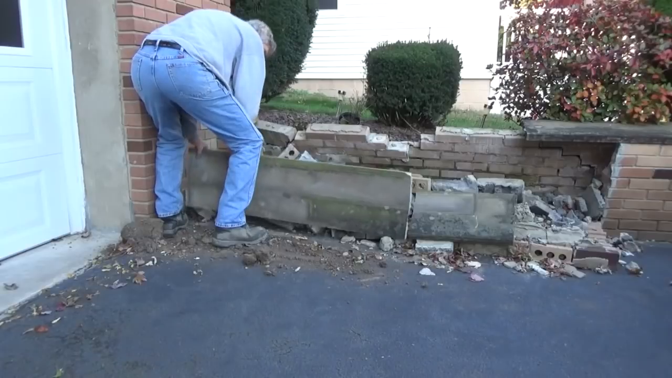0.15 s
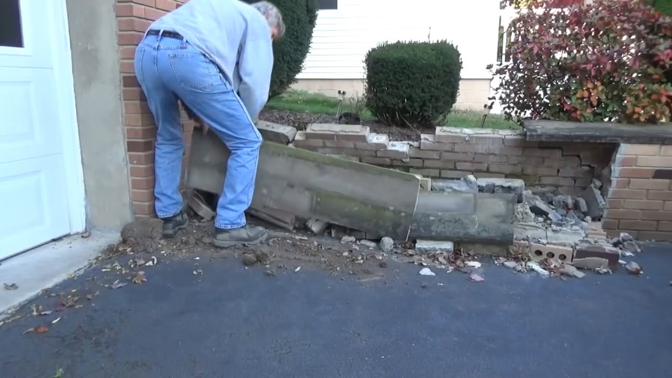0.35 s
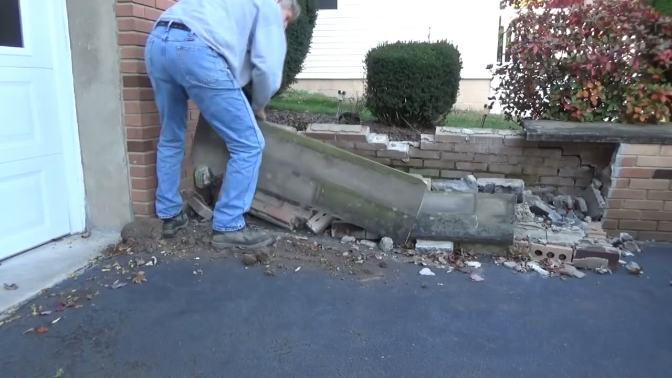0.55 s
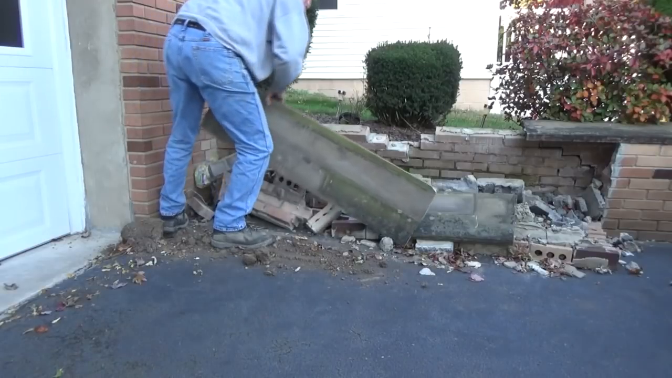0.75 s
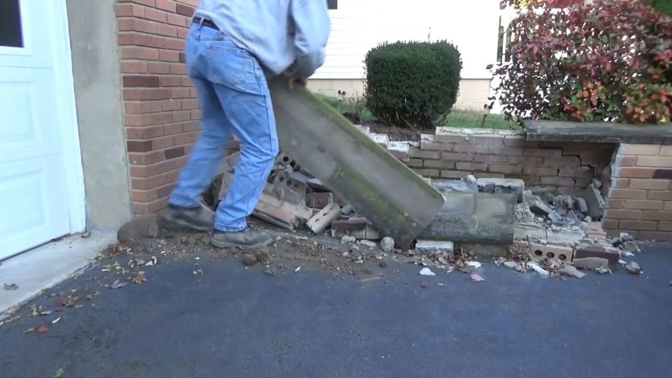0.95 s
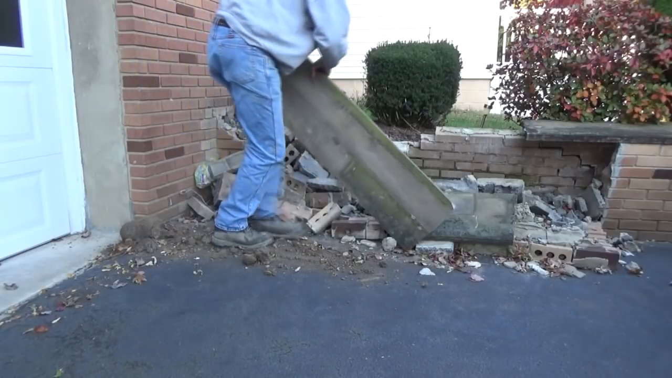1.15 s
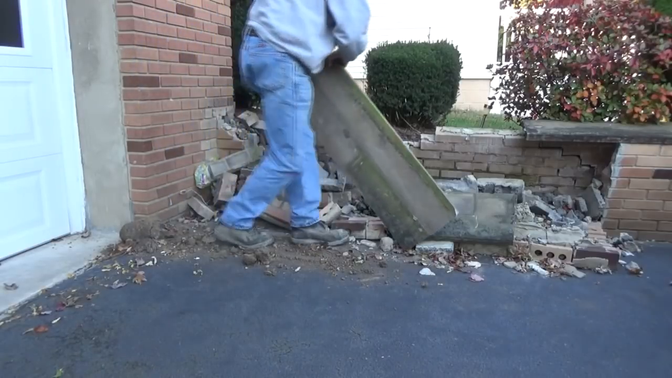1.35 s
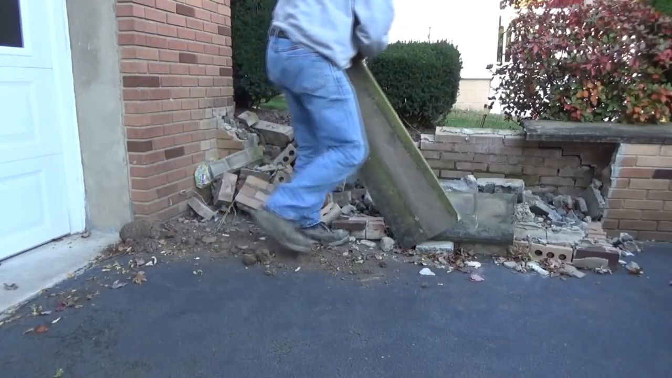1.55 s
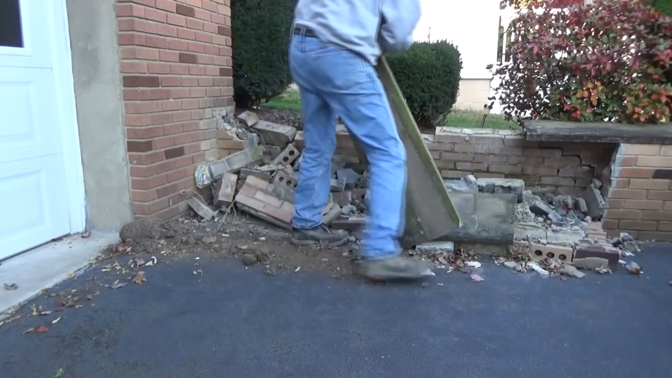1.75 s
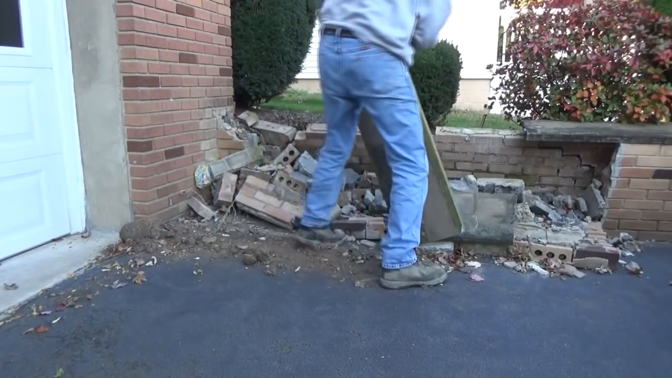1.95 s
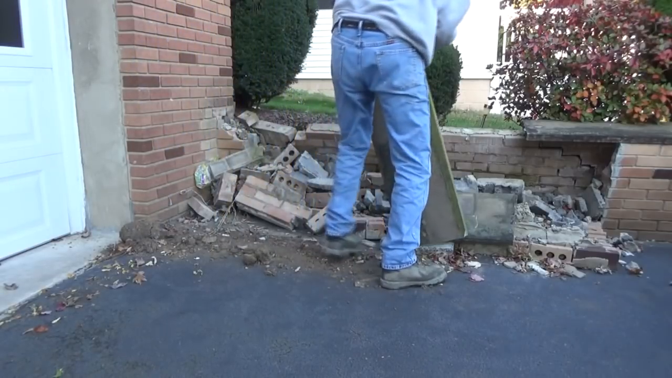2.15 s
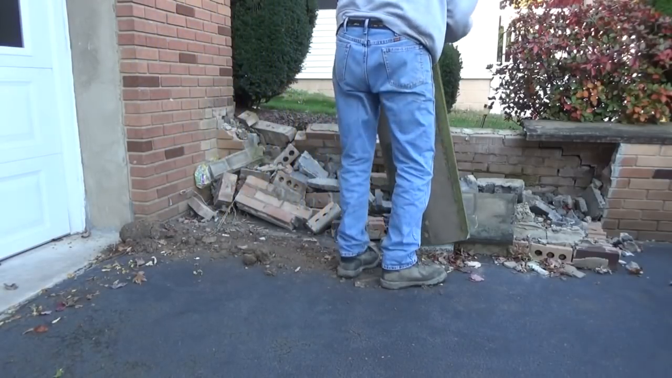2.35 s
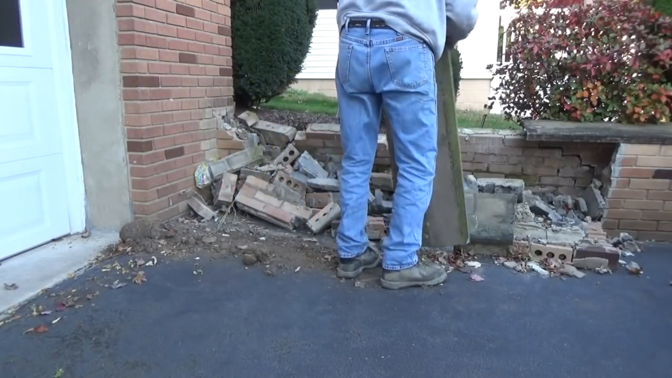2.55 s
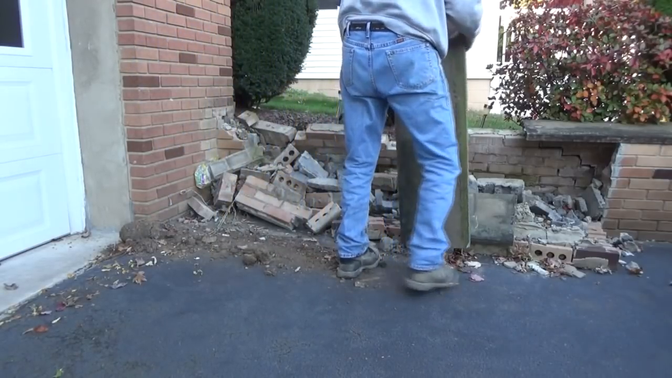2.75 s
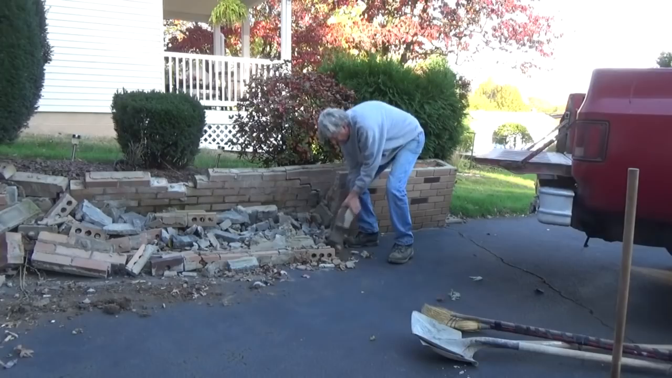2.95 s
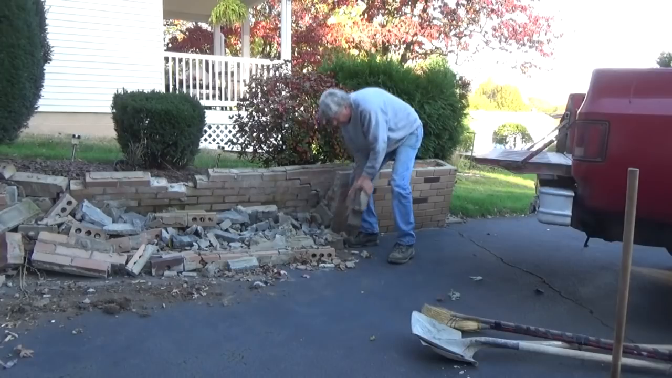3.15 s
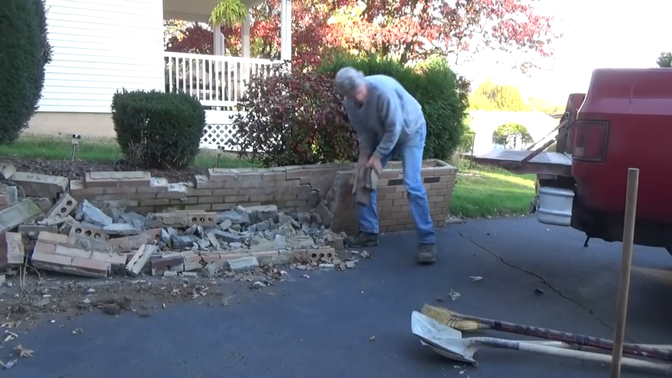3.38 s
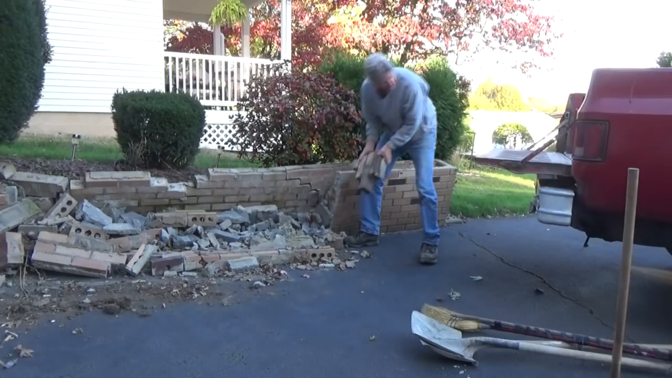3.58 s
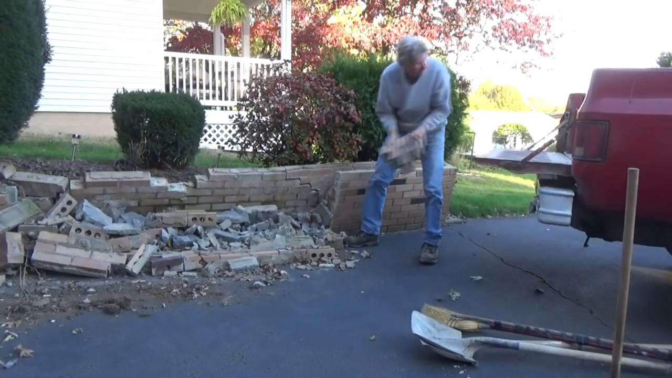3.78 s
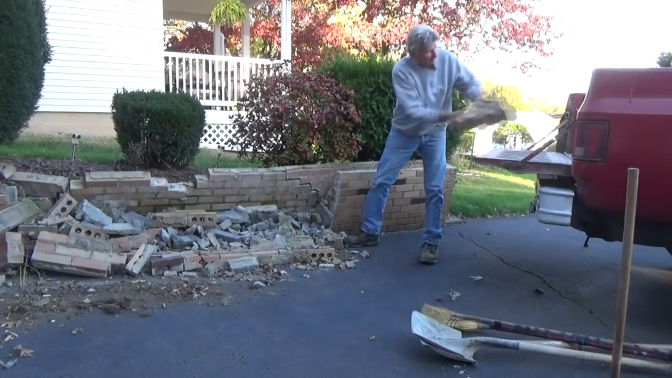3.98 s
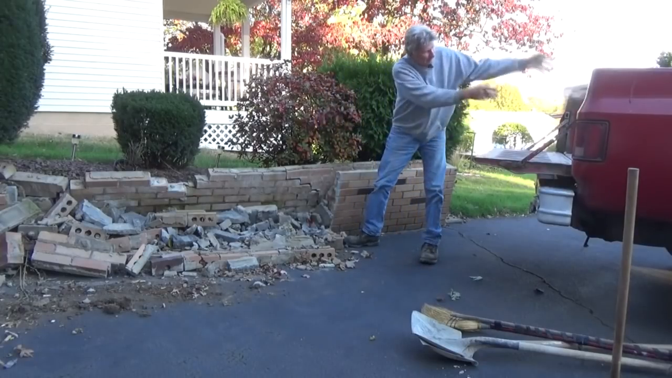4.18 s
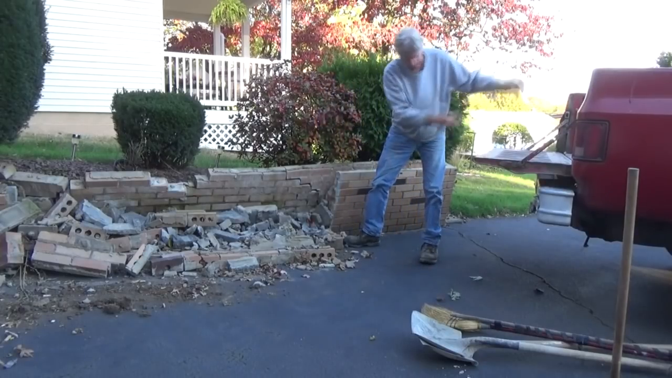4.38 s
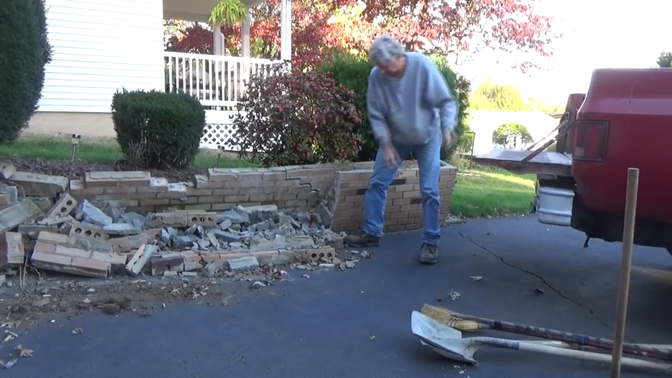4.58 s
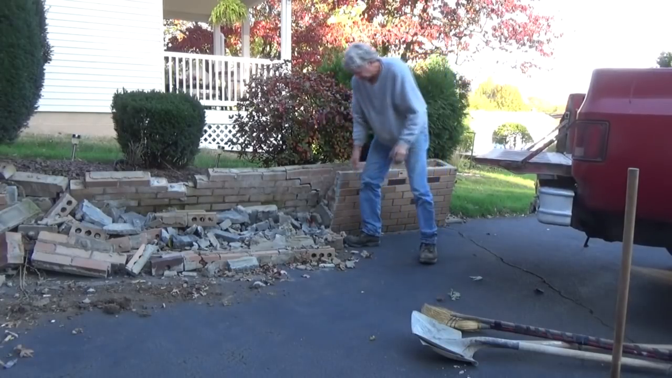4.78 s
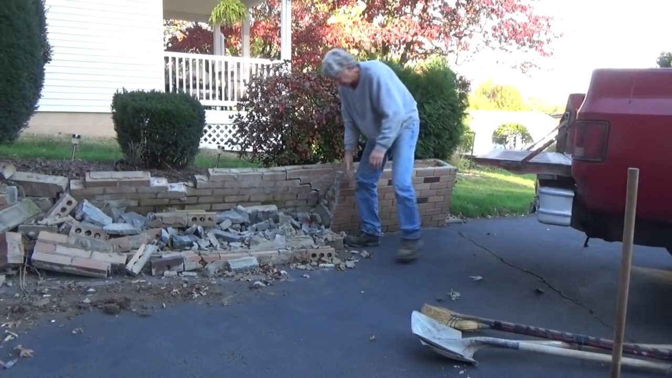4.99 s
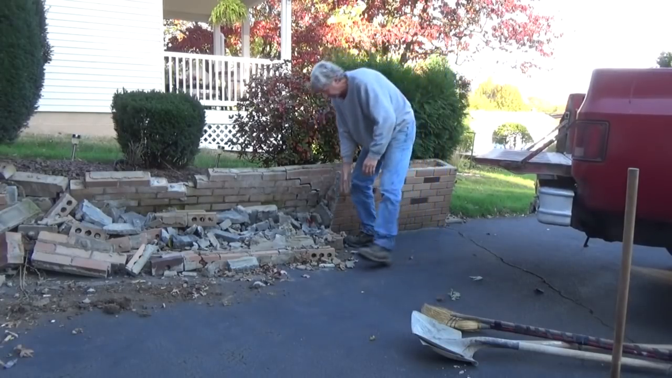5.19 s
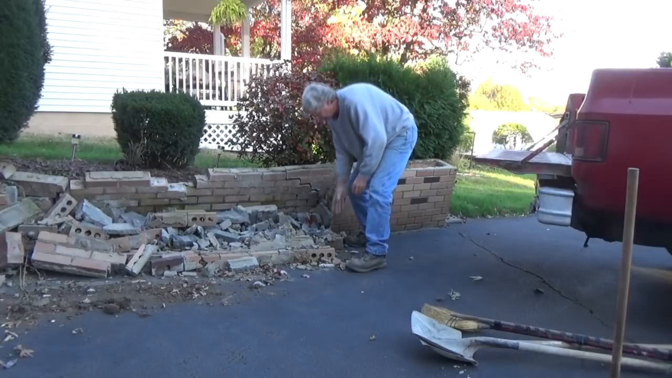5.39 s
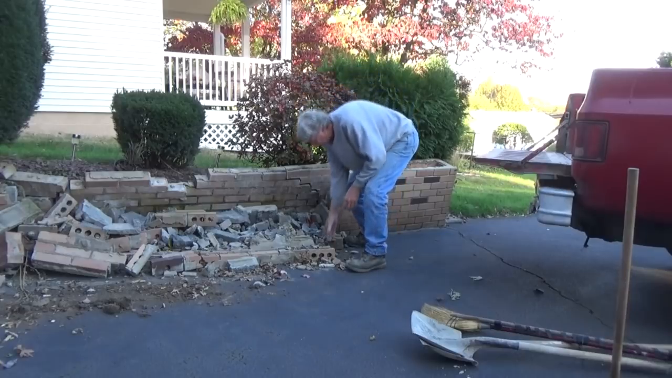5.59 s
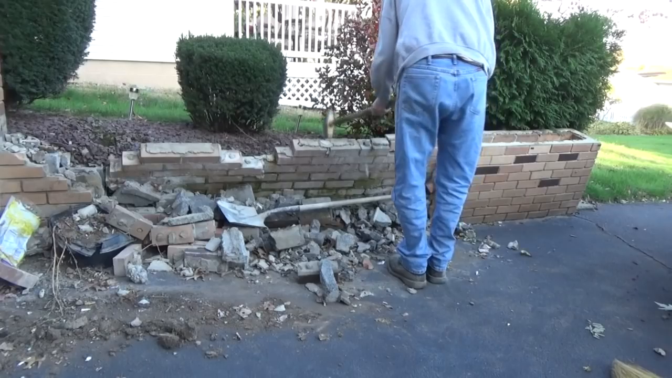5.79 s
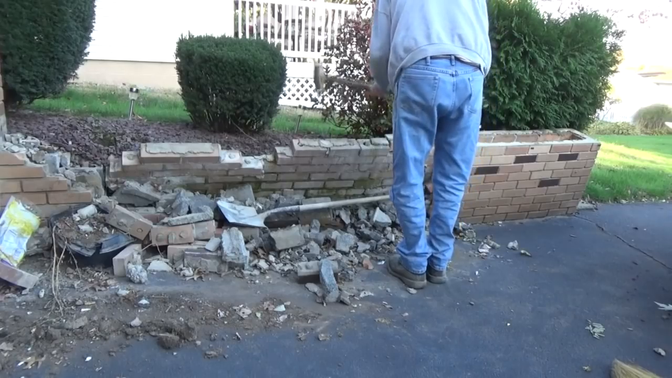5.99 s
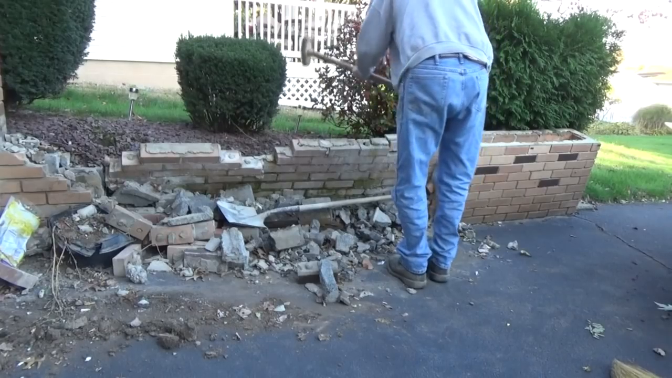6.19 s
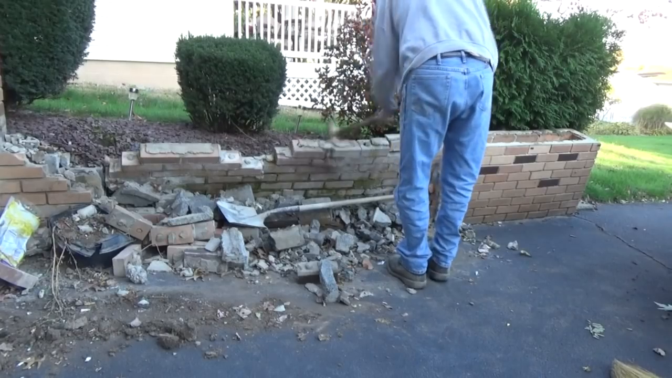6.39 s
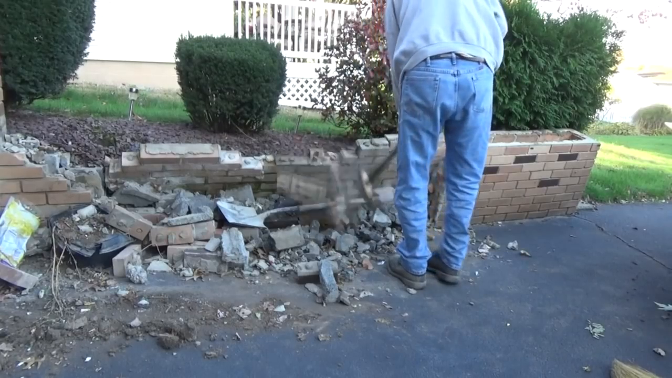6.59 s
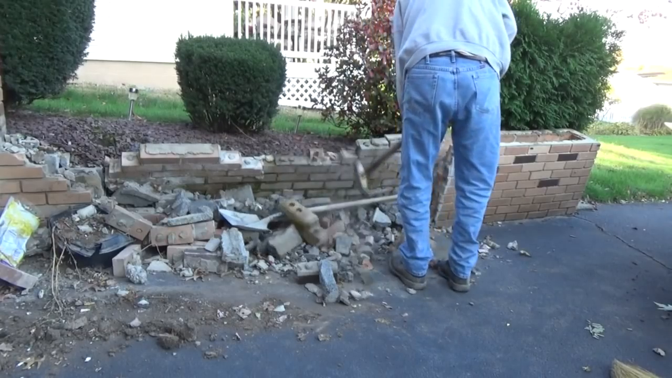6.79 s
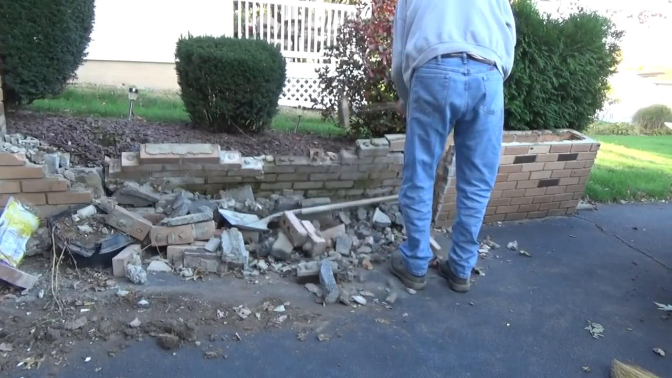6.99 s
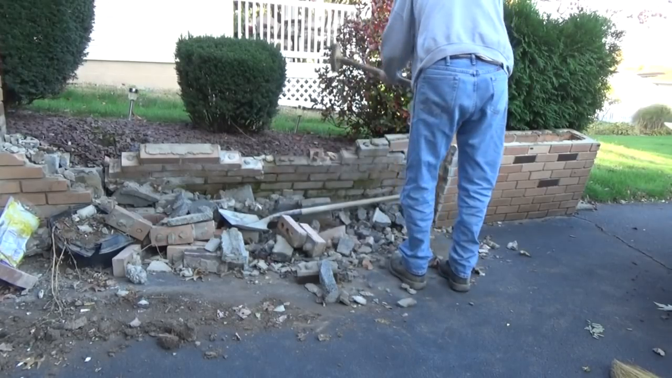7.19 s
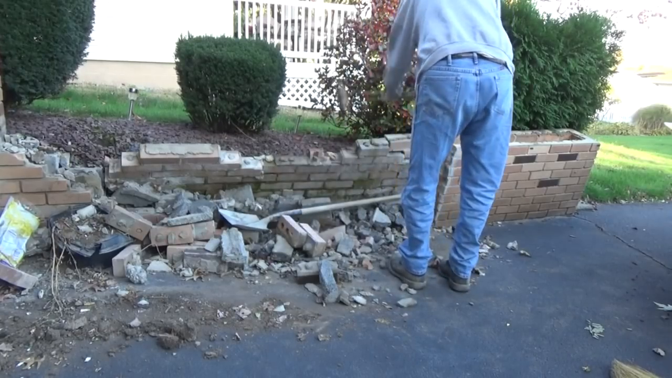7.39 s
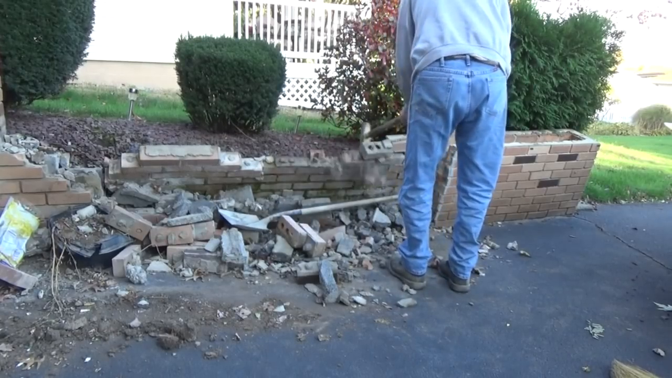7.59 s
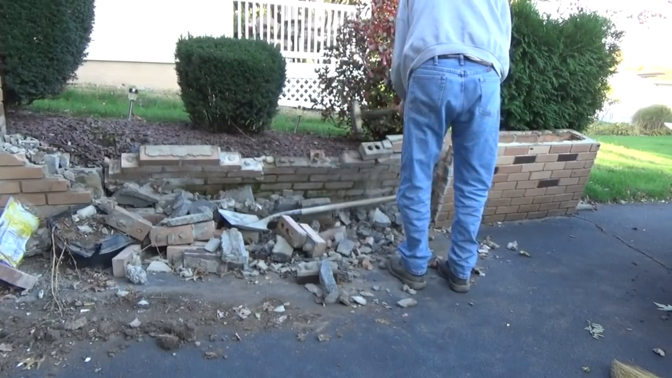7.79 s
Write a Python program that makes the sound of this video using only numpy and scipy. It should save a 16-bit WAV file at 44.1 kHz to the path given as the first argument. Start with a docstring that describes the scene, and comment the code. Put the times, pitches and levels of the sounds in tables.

```python
"""A sledgehammer strikes a brick wall twice; each impact excites a crack and a gritty burst that
decays by damping. After each blow, bricks and mortar fall on a shovel and excite its blade's modes.
Before the blows, a man walks a stone cap slab over driveway grit (stick-slip friction) and tosses a
lump of masonry into a pickup's steel bed, whose panels and floor resonate. The yard scatters a short
echo of the debris; behind it all are faint air noise, a far idling engine and a bird."""
import sys
import numpy as np
from scipy import signal
from scipy.fft import rfft, irfft, next_fast_len
from scipy.io import wavfile
from scipy.ndimage import uniform_filter1d

SR = 44100
rng = np.random.default_rng(int(sys.argv[2]) if len(sys.argv) > 2 else 0)


def to_wav(s):
    """Save 16-bit WAV."""
    ch = np.atleast_2d(s).T  # columns
    pcm = np.round(np.clip(ch, -1, 1) * 32767)  # PCM
    wavfile.write(sys.argv[1], SR, pcm.astype(np.int16))


N = 345744
TIME = np.arange(N) / SR
CONTROL_TIME = TIME[::48]
LEFT_MINUS_RIGHT = np.array([[1], [-1]])


def amp(db):
    """Amplitude ratio of a level in decibels."""
    return 10 ** (np.asarray(db) / 20)


def decay(t, t60):
    """Exponential damping: 60 dB in t60 seconds."""
    return np.exp(-np.log(1000) * t / t60)


def unit_rms(x):
    """Normalisation to an rms of 1."""
    return x / np.sqrt(np.mean(x ** 2) + 1e-20)


def steady(x, span_s):
    """Normalisation by the running rms, which flattens the envelope."""
    return x / np.sqrt(abs(uniform_filter1d(x ** 2, max(int(span_s * SR), 3))) + 1e-12)


def at_frequency(points, hz):
    """Interpolation on a logarithmic frequency axis."""
    f, value = np.transpose(points)
    return np.interp(np.log(hz + 1), np.log(f + 1), value)


def add(mix, start_s, sound):
    """Superposition of a delayed sound on the mix."""
    part = mix[:, max(round(start_s * SR), 0):][:, :sound.shape[-1]]
    part += sound[..., :part.shape[1]]


def colour(x, spectrum):
    """Zero-phase filtering by points of (f/Hz, gain/dB)."""
    size = next_fast_len(x.shape[-1])
    gain = amp(at_frequency(spectrum, np.fft.rfftfreq(size, 1 / SR)))
    return irfft(rfft(x, size) * gain, size)[..., :x.shape[-1]]


def resonator(x, hz, width_hz):
    """Forced response of one damped mode, with unit gain at resonance."""
    carrier = np.exp(2j * np.pi * hz * TIME)
    pole = np.exp(-np.pi * width_hz / SR)
    return 2 * (carrier * signal.lfilter([1 - pole], [1, -pole], x / carrier + 1e-18)).real


def resonances(x, modes):
    """Forced response of parallel modes (f/Hz, bandwidth/Hz, gain/dB)."""
    return sum(amp(db) * signal.lfilter(*signal.iirpeak(hz, hz / width, fs=SR), x)
               for hz, width, db in modes)


def ringing(modes):
    """Free vibration: damped sinusoids, each with a slightly different phase at the two ears."""
    t = np.arange(SR) / SR
    return sum(amp(db) * decay(t, t60) * np.sin(2 * np.pi * hz * t + 0.61 * rng.standard_normal((2, 1)))
               for hz, db, t60 in modes)


def damp_octaves(x, t60s, age):
    """Frequency-dependent damping: each octave decays at its own rate."""
    centres = np.geomspace(60, 15360, 9)
    log_f = np.log(np.fft.rfftfreq(x.shape[-1], 1 / SR) + 1)
    spectrum = rfft(x)
    bands = (irfft(spectrum * np.interp(log_f, np.log(centres), row), x.shape[-1]) for row in np.eye(9))
    return sum(band * decay(age, at_frequency(t60s, hz)) for hz, band in zip(centres, bands))


def crackle(size, per_s, spread_db):
    """Granular noise: two channels in short grains of random strength."""
    strength_db = spread_db * np.minimum(rng.exponential(1, size), 5)
    grain = np.minimum(np.arange(size) * per_s / SR, size - 1).astype(int)
    return unit_rms(rng.standard_normal((2, size)) * amp(strength_db[grain]))


def envelopes(start_s, rise_s, hold_s, t60):
    """Linear rise, hold and exponential decay, one column per event."""
    age = CONTROL_TIME[:, None] - start_s
    return np.clip(age / rise_s, 0, 1) * decay(np.maximum(age - rise_s - hold_s, 0), t60)


def power_sum(shapes, db):
    """Joint amplitude of incoherent events, whose powers add."""
    return np.interp(TIME, CONTROL_TIME, np.sqrt(np.sum((shapes * amp(db)) ** 2, axis=1)))


# stereo width: f/Hz, side over mid/dB
SIDE_SPECTRUM = [(60, -54), (200, -26), (600, -13.5), (1500, -11), (4500, -12.5), (8000, -11), (13000, -43)]
def stereo(pair, wide_db):
    """Partial coherence between the ears: two independent signals serve as mid and side."""
    side = amp(wide_db) * colour(pair[1], SIDE_SPECTRUM)
    return np.array([pair[0] + side, pair[0] - side])


# suburban air: f/Hz, relative level/dB
AIR_SPECTRUM = [(15, -34), (25, -12.5), (76, 0), (145, -4.5), (217, -5.5), (285, -10.5), (775, -9.5),
                (2480, -21), (2910, -20.5), (3160, -23), (5430, -29.5), (9570, -31), (16000, -39)]
def air():
    """Stationary broadband noise, strongest in the bass."""
    return amp(-48.5) * stereo(unit_rms(colour(rng.standard_normal((2, N)), AIR_SPECTRUM)), wide_db=4)


# course of the engine's loudness: t/s, level/dB
ENGINE_LEVELS = [(0.0, -50), (0.45, -46), (2.75, -50), (3.2, -63), (5.6, -64), (5.8, -57), (7.84, -52.5)]
def engine(hz=77.8):
    """Narrow-band noise beats at random: the throb of a far idling engine."""
    times, db = np.transpose(ENGINE_LEVELS)
    gain = amp(np.interp(TIME, times, db) - 2.5)
    hum = resonances(rng.standard_normal(N), [(hz, 8, 0)])
    throb = resonances(hum, [(hz, 16, 0)])
    return gain * steady(throb, 0.13)


# a far bird's calls: t/s, duration/s, first f/Hz, last f/Hz, level/dB
BIRD_CALLS = [(2.5, 0.153, 3040, 2880, -50), (3.898, .48, 3910, 3200, -55.5)]
def bird():
    """Frequency modulation: two simultaneous whistled tones swell, waver and sag in pitch."""
    out = np.zeros((2, N))
    waver_hz = 110 * unit_rms(uniform_filter1d(rng.standard_normal(N), 150))
    for start, duration, first_hz, last_hz, db in BIRD_CALLS:
        progress = np.linspace(0, 1, int(duration * SR))
        hz = first_hz + (last_hz - first_hz) * progress ** 2.3 + waver_hz[:len(progress)]
        phase = 2 * np.pi * np.cumsum(hz) / SR
        tones = np.sin(phase) + 0.65 * np.sin(.76 * phase)
        add(out, start, amp(db) * np.sin(np.pi * progress) * tones)
    return out


# reverberation time of the yard: f/Hz, T60/s
YARD_T60 = [(100, 0.49), (1000, 0.76), (4000, 0.32), (12000, 0.33)]
def yard_echo(x, reflections_per_s=2000):
    """Scattering from house front and driveway: convolution with sparse, decaying reflections."""
    t = np.arange(SR // 2) / SR
    taps = rng.standard_normal((2, len(t)))
    taps *= (rng.random((2, len(t))) < reflections_per_s / SR) * (t > .004)
    tail = damp_octaves(stereo(taps, wide_db=7), YARD_T60, t)
    return signal.fftconvolve(x.mean(0)[None], tail / np.linalg.norm(tail[0]), axes=1)[:, :N]


# slab, soles and bricks dragged over grit: t/s, rise/s, hold/s, stone/dB, crumbs/dB, sand/dB
GROUND_SCRAPES = [(0.0, 0.0029, 0.061, -40.5, -75, -79), (0.148, 0.031, 0.062, -66, -51, -38.5),
                  (0.276, 0.026, 0.017, -32, -41, -55), (0.447, .04, .01, -38.5, -53, -66),
                  (0.499, 0.031, 0.018, -26.5, -29.5, -36), (0.562, 0.027, 0.16, -36, -48, -60),
                  (0.798, 0.017, .08, -31, -46, -50), (0.908, 0.032, .01, -29.5, -35, -43),
                  (0.961, 0.022, 0.048, -38, -53, -53), (1.034, 0.018, 0.12, -62, -52, -45),
                  (1.138, 0.03, 0.056, -43, -40, -39.5), (1.233, .008, 0.051, -35.5, -35.5, -27.5),
                  (1.31, 0.014, 0.075, -36, -35, -28.5), (1.45, 0.031, 0.027, -34.5, -41.5, -41),
                  (1.533, 0.025, 0.045, -53, -47.5, -46), (1.625, 0.025, 0.024, -64, -47, -37),
                  (1.72, 0.026, 0.22, -43, -47.5, -49), (1.964, 0.017, .11, -32, -32.5, -34),
                  (2.11, 0.067, 0.092, -44, -35, -33), (2.27, 0.022, 0.016, -34, -26, -29.5),
                  (2.347, 0.032, 0.033, -36, -27.5, -33), (2.74, 0.021, 0.18, -42.5, -49, -52),
                  (3.113, 0.032, 0.061, -38, -34.5, -37.5), (3.248, .02, 0.057, -55, -48, -49),
                  (3.315, 0.078, .01, -51, -37, -36.5), (3.465, 0.016, 0.028, -45.5, -34.5, -33),
                  (3.987, 0.064, 0.13, -63, -53, -51), (5.45, 0.018, 0.017, -40, -67, -65),
                  (5.668, 0.0095, 0.015, -40, -48.5, -68), (5.812, .02, 0.05, -49, -49, -48),
                  (6.152, 0.035, 0.1, -41, -37, -41), (6.595, 0.11, 0.023, -45, -30, -34.5),
                  (7.069, 0.026, 0.071, -36, -35.5, -42)]
# weight or rubble landing on grit: t/s, T60/s, stone/dB, crumbs/dB, sand/dB
GROUND_CRUNCHES = [(0.097, 0.28, -55, -45.5, -54), (1.175, 0.094, -22.5, -35, -31),
                   (1.42, 0.16, -31.5, -27, -34), (1.885, 0.24, -38, -25, -25.5),
                   (2.687, 0.37, -40.5, -35, -39), (2.973, 0.55, -42, -38, -38),
                   (5.703, 0.43, -28.5, -32.5, -42), (5.893, 0.48, -41, -35.5, -37.5),
                   (6.001, 0.24, -36, -35, -44), (6.052, 0.45, -41, -31, -34.5),
                   (6.344, .3, -39, -35.5, -45), (6.704, 1.6, -28, -19.5, -27.5), (6.92, .7, -39, -45, -28),
                   (7.349, 0.75, -42.5, -52, -48), (7.779, 1.1, -50, -30, -29.5)]
def friction(scrape_t60=0.17, crunch_rise_s=0.0021, trickle_t60=0.91, trickle_db=-19):
    """Amplitudes of stone, crumb and sand noise under sliding and impact; loosened grit trickles on."""
    scrapes, crunches = np.transpose(GROUND_SCRAPES), np.transpose(GROUND_CRUNCHES)
    push = np.hstack([envelopes(*scrapes[:3], scrape_t60),
                      envelopes(crunches[0], crunch_rise_s, 0, crunches[1])])
    trickle = np.hstack([envelopes(*scrapes[:3], trickle_t60),
                         envelopes(crunches[0], crunch_rise_s, 0, trickle_t60)])
    shapes = np.maximum(push, amp(trickle_db) * trickle)
    return [power_sum(shapes, db) for db in np.hstack([scrapes[3:], crunches[2:]])]


def pebbles(per_s, spread_db, low_hz, decay_cycles, sizes=24):
    """A Poisson process of impacts: each bit of mortar rings in two modes set by its size."""
    out, t = np.zeros((2, N)), np.arange(900) / SR
    for hz in np.geomspace(low_hz, 11000, sizes):
        hits = np.flatnonzero(rng.random(N) < per_s / sizes / SR)
        for at, (strength, pan, detune, shape) in zip(hits, rng.random((len(hits), 4))):
            cycles = hz * (.9 + .2 * detune) * t
            modes = np.sin(2 * np.pi * cycles) + .5 * np.sin(2 * np.pi * cycles * (1 + shape / 2))
            clink = amp(spread_db * strength ** 2) * modes * np.exp(-cycles / decay_cycles)
            add(out, at / SR, np.outer([.7 + .6 * pan, 1.3 - .6 * pan], clink))
    return unit_rms(out)


# coarse crumbs and fine sand: f/Hz, relative level/dB
CRUMB_SPECTRUM = [(300, -65), (1200, -5.5), (2500, 1.5), (5000, 1.5), (7500, -5.5), (11000, -10.5),
                  (16000, -32)]
SAND_SPECTRUM = [(1000, -11.5), (5000, -8), (8000, -1.5), (10400, 0.5), (12300, -10), (16000, -15)]
def grit(crumb_gain, sand_gain):
    """Granular contact noise: crumbs crackle, sand fizzes and single pebbles click among them."""
    crumbs = steady(colour(crackle(N, per_s=1500, spread_db=3.5), CRUMB_SPECTRUM), .05)
    sand = steady(colour(crackle(N, per_s=2200, spread_db=2.85), SAND_SPECTRUM), 0.036)
    clicks = .45 * pebbles(per_s=170, spread_db=18, low_hz=3200, decay_cycles=2.5)
    grains = stereo(crumb_gain * crumbs + sand_gain * sand, wide_db=-2.5)
    return amp(-2.5) * (grains + np.hypot(crumb_gain, sand_gain) * clicks)


# rubbing stone: f/Hz, relative level/dB
STONE_SPECTRUM = [(50, -24), (110, -3), (370, 1), (850, -3.5), (1400, -1.5), (1900, -7.5), (2600, -10.5),
                  (4000, -14), (9000, -43)]
# hollow resonances of the slab: f/Hz, bandwidth/Hz, relative gain/dB
SLAB_MODES = [(193, 52, 9), (385, 86, 1), (536, 14, 2.5), (692, 80, 4.5), (784, 48, 7), (914, 130, 5),
              (1180, 170, -1.5), (1393, 48, 3.5), (1594, 82, 2), (1785, 55, 9.5)]
def grinding_slab(gain):
    """Stick-slip friction of rough stone drives the slab's modes."""
    slips = colour(crackle(N, per_s=900, spread_db=2.9), STONE_SPECTRUM)
    hollow_ring = unit_rms(resonances(slips, SLAB_MODES))
    rub = steady(unit_rms(slips) + 1.7 * hollow_ring, .06)
    return amp(-3.5) * stereo(rub, wide_db=-3.5) * gain


# boots, slab corners and bricks meeting the ground: t/s, level/dB, f/Hz, T60/s
GROUND_THUDS = [(0.204, -26.5, 324, 0.12), (0.531, -30, 188, 0.11), (1.179, -12, 496, 0.071),
                (1.419, -22.5, 180, 0.095), (1.893, -25, 231, 0.23), (1.977, -24.5, 231, 0.13),
                (2.041, -22, 680, 0.094), (2.297, -27, 899, 0.1), (5.564, -27.5, 223, 0.097),
                (5.702, -16.5, 189, 0.16), (6.056, -32, 330, 0.2), (6.205, -31, 330, 0.21),
                (6.727, -8.5, 756, 0.15), (6.782, -14, 234, 0.21), (6.819, -14.5, 735, 0.39),
                (6.974, -23, 286, 0.14), (7.11, -31.5, 282, 0.31), (7.2, -27.5, 330, 0.19),
                (7.283, -31.5, 350, 0.18), (7.782, -25, 870, 0.2)]
def thuds():
    """Heavily damped impacts: dull noise bursts with one broad spectral peak."""
    out, t = np.zeros((2, N)), np.arange(SR // 2) / SR
    for start, db, hz, t60 in GROUND_THUDS:
        spectrum = [(hz / 5, -20), (hz / 2, -2), (hz, 0), (hz * 2.5, -8), (hz * 6, -23), (hz * 20, -45)]
        noise = steady(colour(rng.standard_normal((2, len(t))), spectrum), 0.0145)
        envelope = (1 - np.exp(-t / 0.0062)) * decay(t, t60)
        add(out, start, amp(db - 4) * stereo(noise, wide_db=-9) * envelope)
    return out


# chips that snap or land: t/s, level/dB, f/Hz, clink re snap/dB
CHIP_SNAPS = [(0.156, -18, 9500, -10), (0.176, -20, 9500, -8), (0.1846, -25, 10100, 3),
              (0.231, -25.5, 4430, -15), (0.276, -25, 4620, -18), (0.9427, -22.5, 4850, -6.5),
              (1.1793, -22, 2740, -6), (1.2432, -17.5, 10100, -9), (1.4209, -15, 9550, -17),
              (1.8918, -10, 10100, -20), (1.8997, -17, 10100, -29), (2.2973, -18, 3300, -10),
              (2.6898, -23.5, 9700, -22), (2.772, -26, 3190, -15), (2.7852, -17, 5330, -10),
              (2.8105, -20.5, 5400, -14), (2.9769, -26.5, 4730, -28), (3.147, -25, 4080, -2.5),
              (3.183, -18, 9200, -22), (3.475, -24, 4100, -12), (4.0915, -28, 10740, -3),
              (5.3237, -25, 1740, 0.5), (5.3475, -22, 2520, -4), (5.502, -35.5, 2060, -29),
              (5.5648, -30, 10550, -8), (5.7933, -27.5, 2950, 0), (6.003, -29, 4000, -17),
              (6.0558, -13.5, 8230, -7), (6.098, -20.5, 4440, -22), (6.186, -26, 3280, -22),
              (6.2155, -24, 8100, -22), (6.2286, -18.5, 7540, -12), (6.311, -26.5, 4520, -5),
              (6.3482, -18, 11050, -9), (6.6675, -22, 2750, -8), (6.8312, -12.5, 2200, -21),
              (6.994, -21.5, 8990, -20.5), (7.0514, -20, 10400, -17), (7.1774, -22.5, 3570, 1),
              (7.185, -25.5, 3230, -0.5), (7.2043, -19, 3270, -4), (7.3507, -27.5, 2450, 0),
              (7.4003, -27.5, 10200, -14), (7.4142, -25, 6100, -9), (7.4714, -26, 5400, -20.5)]
# noise of a snap: f/Hz, relative level/dB
SNAP_SPECTRUM = [(200, -23), (1000, -15), (3000, -5), (10500, -4.5), (13000, -18), (16000, -24)]
def chips(snap_t60=0.021, fracture_s=0.00057):
    """Brittle fracture: a spike opens a dry snap, and the chip clinks in four inharmonic modes."""
    out, t = np.zeros((2, N)), np.arange(4096) / SR
    spike = 1 + amp(-2.5) * np.exp(-t / fracture_s)
    for start, db, hz, clink_db in CHIP_SNAPS:
        noise = colour(rng.standard_normal((2, len(t))), SNAP_SPECTRUM)
        pitched = steady(noise + resonances(noise, [(hz, hz / 5, 5)]), 0.0023)
        snap = stereo(pitched * spike, wide_db=-1) * decay(t, snap_t60)
        modes_hz = hz * np.array([1, .54, .73, 1.38])
        weights = np.array([1, .4, .4, .4]) / (1 + (modes_hz / 10000) ** 8)
        clink = weights @ np.sin(2 * np.pi * (np.outer(modes_hz, t) + rng.random((4, 1))))
        add(out, start, amp(db - 4) * (snap + amp(clink_db) * clink * np.exp(-t / .011)))
    return out


def brick_slide():
    """A granular avalanche: the loosened course of bricks sheds a shower of clinking lumps."""
    gain = power_sum(envelopes(start_s=6.7, rise_s=.04, hold_s=0, t60=1.25), db=-25)
    return gain * steady(pebbles(per_s=190, spread_db=15, low_hz=2100, decay_cycles=13), .1)


# bricks hitting the shovel: t/s, level/dB, most excited f/Hz
BLADE_HITS = [(6.732, -8.5, 730), (6.752, -1.5, 1250), (6.768, -4, 1910), (6.797, 0, 2223),
              (6.815, -11, 2230), (7.779, -2, 1800), (7.817, 0, 1600)]
# modes of the steel blade: f/Hz, level/dB, T60/s
BLADE_MODES = [(339, -38, .5), (552, -33, .5), (727, -28, .5), (857, -28, .42), (1149, -33, .2),
               (1254, -28, .38), (1601, -19, .13), (1700, -25, .07), (1806, -22, .18), (1901, -26, .24),
               (1954, -30, .28), (2085, -26, .14), (2223, -19.5, .38), (2283, -27, .08), (2561, -28, .12),
               (2607, -31, .3), (2706, -27, .15), (3015, -28, .13), (3230, -30, .13), (3393, -30, .1)]
def shovel(favour_db=5):
    """Modal excitation depends on the point of impact: each brick favours some modes and sheds crumbs."""
    out, t = np.zeros((2, N)), np.arange(SR) / SR
    spray_spectrum = [(150, -31), (700, -4), (1800, 11), (3200, 1.5), (6000, -18), (15000, -30)]
    for start, db, centre_hz in BLADE_HITS:
        modes = [(hz, mode_db + favour_db * np.exp(-(np.log2(hz / centre_hz) / 0.11) ** 2), t60)
                 for hz, mode_db, t60 in BLADE_MODES]
        crumbs = unit_rms(colour(crackle(SR, per_s=900, spread_db=1.2), spray_spectrum))
        spray = amp(-16.5) * stereo(crumbs, wide_db=-13) * np.exp(-t / 0.024)
        add(out, start, amp(db) * (ringing(modes) + spray))
    return out


def strike(impacts, spectrum, t60s, grains_per_s, crack_db, wide_db):
    """Impact noise: a crack, then a gritty burst that stays level briefly and dies away."""
    out, t = np.zeros((2, N)), np.arange(SR // 2) / SR
    fade = np.minimum(10 * (t[-1] - t), 1)
    for start, db, hold_s, t60_factor, treble_db in impacts:
        gritty = steady(colour(crackle(len(t), grains_per_s, spread_db=1.5), spectrum), 0.0326)
        noise = colour(rng.standard_normal(len(t)), spectrum)
        crack = steady(colour(noise, [(300, -4), (2500, 14)]), 0.0026)
        burst = damp_octaves(stereo(gritty, wide_db), t60s, np.maximum(t - hold_s, 0) / t60_factor)
        impact = burst * (1 - np.exp(-t / 0.0024)) + amp(crack_db) * crack * np.exp(-t / 0.0048)
        contact_s = 0.00026 * amp(-1.5 * min(treble_db, 0))  # a duller blow is a longer contact
        onset = 1 - np.exp(-(t / contact_s) ** 2)
        add(out, start, amp(db) * colour(impact, [(600, 0), (2500, treble_db)]) * onset * fade)
    return out


# the lump tumbling in the bed: t/s, level/dB, hold time/s, T60 factor, treble/dB, floor boom/dB
LUMP_IMPACTS = [(4.509, -16.5, 0.038, 0.33, 1.5, -19.5), (4.548, -15, 0.063, 0.94, -6.5, -21),
                (4.622, -23, 0.0071, 0.85, 2.5, -13), (4.7, -19, 0.048, 1, -6.5, -13.5),
                (4.768, -24.5, 0.0093, 0.83, -2.5, -17), (4.885, -25, 0.018, 0.64, -7.5, -27.5),
                (4.984, -15.5, 0.023, 0.41, -13, -18.5), (5.047, -22.5, 0.0074, 0.55, 1.5, -35),
                (5.126, -29.5, 0.0045, 0.51, 4, -43), (5.207, -35, 0.0092, 0.98, 1.5, -37),
                (5.325, -40, .003, 0.22, 14.5, -55), (5.348, -36, 0.0033, 0.16, 14.5, -54)]
# the struck bed: f/Hz, relative level/dB
BED_SPECTRUM = [(30, -16), (55, -13), (85, -9.5), (135, -2), (180, -3.5), (280, -3), (400, -2), (600, -9),
                (1000, -10), (2000, -17.5), (4000, -24.5), (8000, -33), (12000, -45), (16000, -62)]
# damping of the bed: f/Hz, T60/s
BED_T60 = [(60, 1), (400, 0.54), (2000, 0.65), (10000, 0.41)]
# its steel panels: f/Hz, bandwidth/Hz, gain/dB
PANEL_MODES = [(248, 9.5, -12), (338, 7.2, -9), (387, 16, -3.5), (425, 15, -4), (530, 16, 1), (703, 23, -1)]
def truck_bed(floor_hz=179):
    """Plate resonance: the tumbling lump sets the steel panels ringing and the floor drumming."""
    impacts = np.array(LUMP_IMPACTS)
    crash = strike(impacts[:, :-1], BED_SPECTRUM, BED_T60, grains_per_s=550, crack_db=0, wide_db=7.5)
    boom = power_sum(envelopes(impacts[:, 0], rise_s=0.019, hold_s=0.049, t60=0.51), impacts[:, -1])
    drum = resonator(rng.standard_normal((2, N)), floor_hz, width_hz=32)
    drum = steady(resonator(drum, floor_hz, width_hz=116), 0.0205)
    floor = drum[0] + amp(-7.5) * drum[1] * LEFT_MINUS_RIGHT
    spread = amp(-2) * (crash - crash[::-1])  # the two side walls ring apart from each other
    return crash + resonances(crash + spread, PANEL_MODES) + boom * floor


# blows on the wall: t/s, level/dB, hold time/s, T60 factor, treble/dB
HAMMER_BLOWS = [(6.478, -14.5, 0.042, 0.97, -2.5), (7.556, -16, 0.04, 1, -2.5)]
# the struck wall: f/Hz, relative level/dB
WALL_SPECTRUM = [(30, -41), (70, -14), (140, -9), (190, -3), (290, -11.5), (450, -2), (620, -6),
                 (840, -10.5), (1170, -7), (1640, -13.5), (2170, -12), (4900, -22.5), (9500, -28),
                 (15000, -44)]
# damping of the wall: f/Hz, T60/s
WALL_T60 = [(60, 0.53), (400, 0.35), (2000, 0.37), (10000, 0.56)]
# modes of the steel head: f/Hz, level/dB, T60/s
HEAD_MODES = [(8690, -40, 0.35), (8800, -36, 0.43)]
def sledgehammer():
    """Impulsive excitation: the head strikes brick and mortar and rings faintly in its own modes."""
    out = strike(HAMMER_BLOWS, WALL_SPECTRUM, WALL_T60, grains_per_s=500, crack_db=5.5, wide_db=5)
    for start, *_ in HAMMER_BLOWS:
        add(out, start, ringing(HEAD_MODES))
    return out


def scene():
    """Superposition of all sources; an interaural level difference sets the work a little to the left."""
    stone_gain, crumb_gain, sand_gain = friction()
    debris = chips() + thuds() + shovel() + grit(crumb_gain, sand_gain) + brick_slide()
    work = debris + amp(-9.5) * yard_echo(debris)
    work += sledgehammer() + truck_bed() + grinding_slab(stone_gain)
    pan_db = np.interp(TIME, [4.5, 5.3], [.15, .75]) * LEFT_MINUS_RIGHT
    return work * amp(pan_db) + air() + engine() + bird()


def record(dry, ceiling=.7, cutoff_hz=16000):
    """Soft saturation rounds the loudest peaks; a low-pass filter limits the band."""
    rounded = dry / (1 + (dry / ceiling) ** 4) ** .25
    low_pass = signal.firwin(511, cutoff_hz, window=("kaiser", 9), fs=SR)
    return signal.oaconvolve(rounded, low_pass[None], "same")


dry = scene()
out = record(dry)
to_wav(out)
```